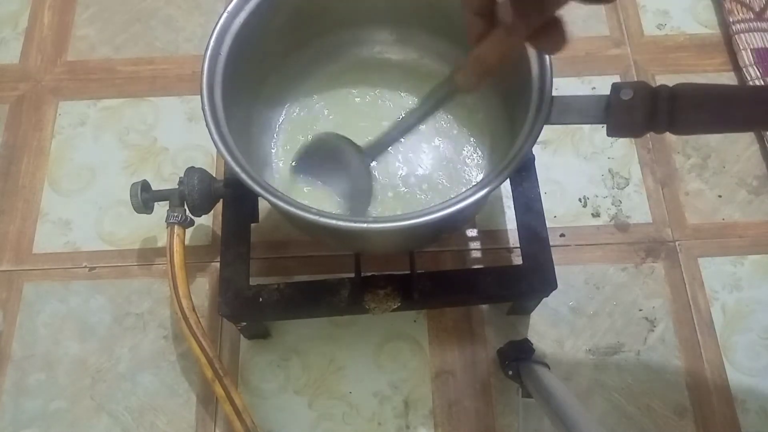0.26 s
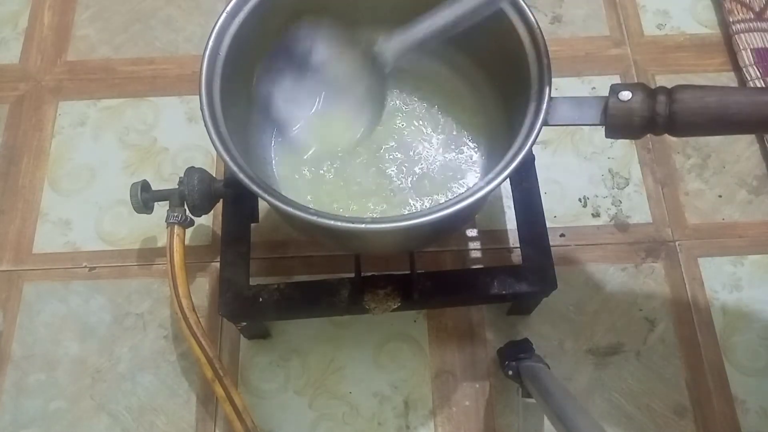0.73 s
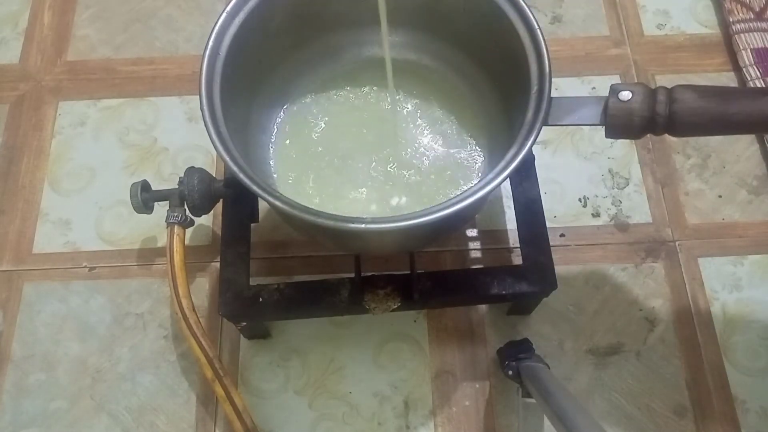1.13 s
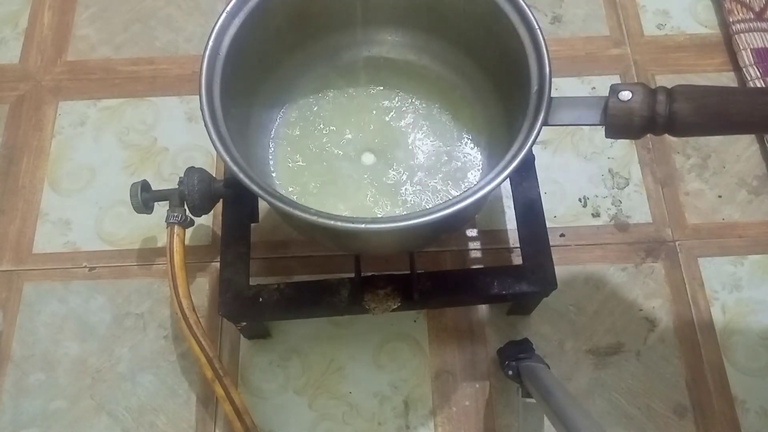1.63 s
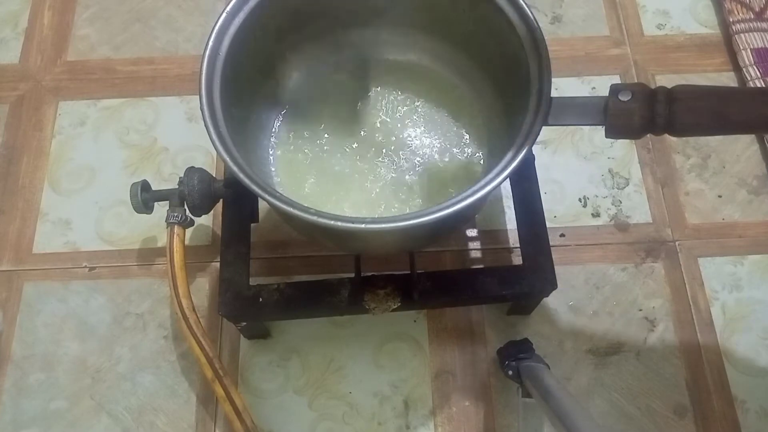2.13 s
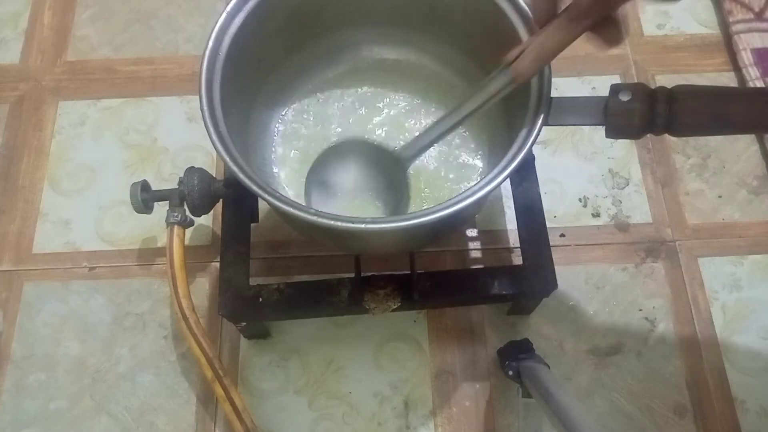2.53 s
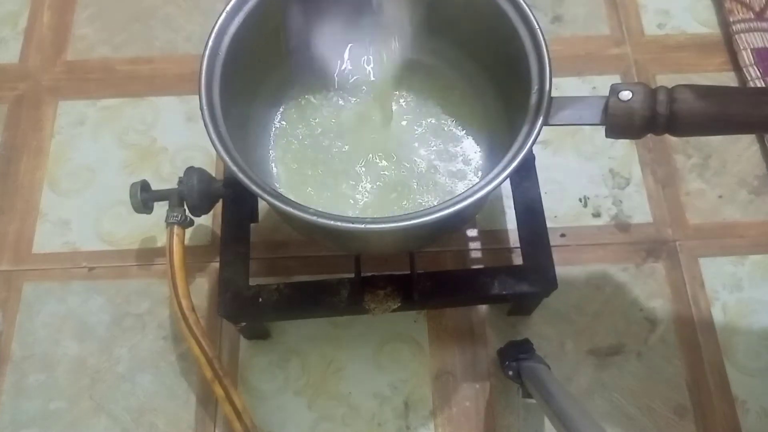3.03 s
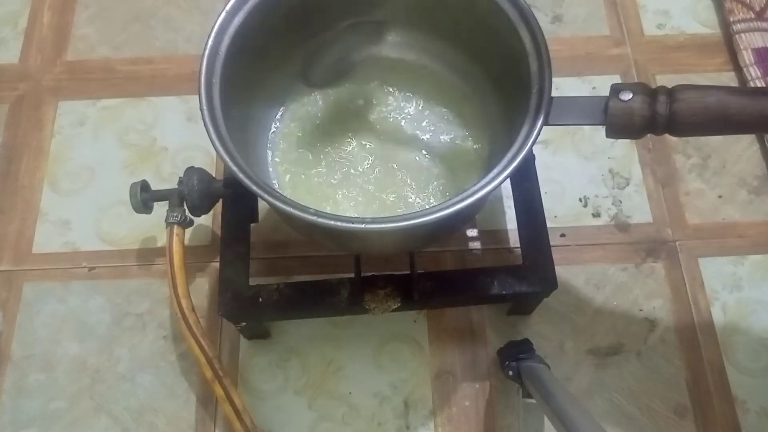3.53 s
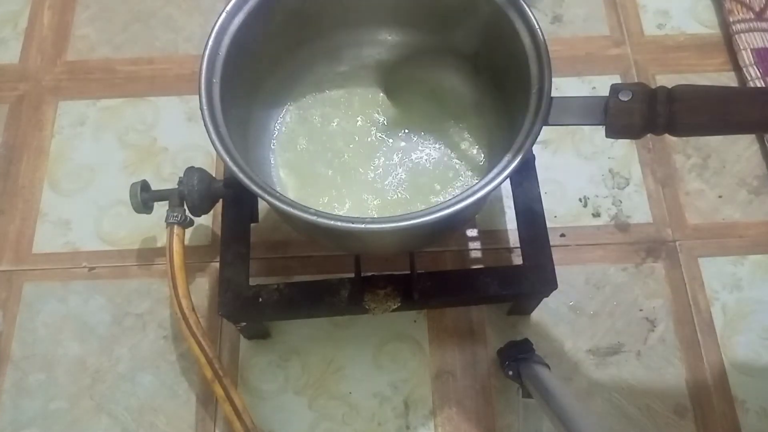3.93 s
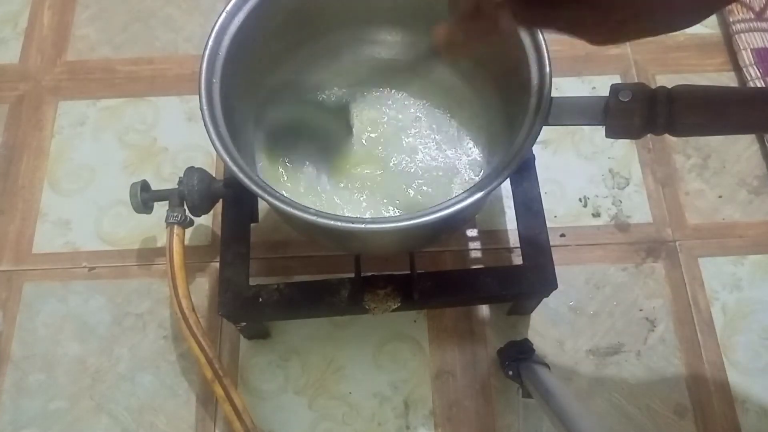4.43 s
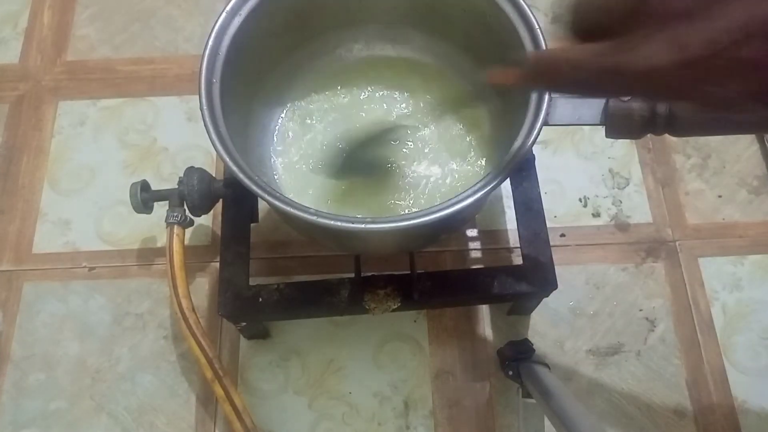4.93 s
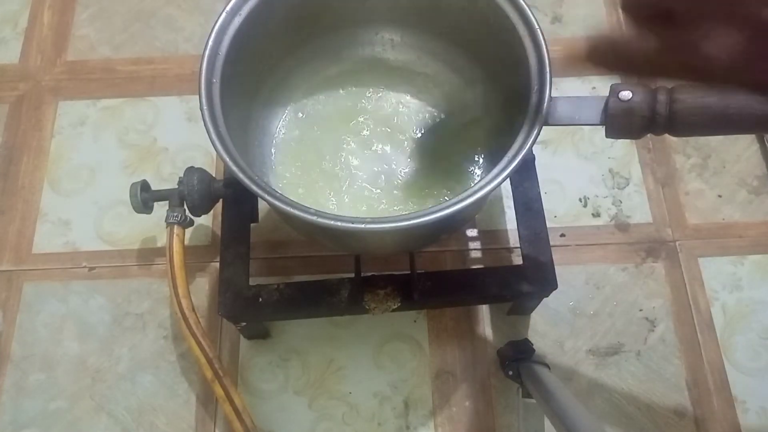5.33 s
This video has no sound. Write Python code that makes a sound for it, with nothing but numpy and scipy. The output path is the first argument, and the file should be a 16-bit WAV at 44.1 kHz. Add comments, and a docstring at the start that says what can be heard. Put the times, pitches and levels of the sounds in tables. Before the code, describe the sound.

For about five and a half seconds, coconut cream boils in a steel saucepan on a gas burner, heard close in mono through a small, thin-bassed microphone. A constant bright hiss, strongest in the treble, flickers with dense fine crackle and countless tiny ringing bubbles. Stirring at the start makes it slightly fuller, then it calms. A small ladle knock with a hollow pan ring comes at 1.0 s, amid wet pops. Around 2.0-2.2 s there is a clearer knock, a splash, sharp spits and a brief surge. Light gurgles continue, with very faint knocks at 2.8 and 3.6 s and crisp spits near 3.7 s. A lower slosh falls at 4.1 s, a burst of sharp spitting and sizzle at 4.6 s, then thicker churning at 4.8 s and a soft splash at 5.1 s. Barely audible low thuds and hum lie underneath; the sizzle continues to the end.

```python
"""Boiling coconut cream

Coconut cream boils in a steel saucepan on a gas ring while a ladle stirs and pours.
Steam is shaped noise, fine bubbles are short rings, gurgles and pops are resonant bursts of noise.
Spits, knocks and splashes follow tables; the pan's modes and air resonance colour the sound.
Low thuds, a hum and a low random flutter lie beneath."""
import sys
import numpy as np
from scipy import signal
from scipy.fft import rfft, irfft
from scipy.io import wavfile
from scipy.ndimage import uniform_filter1d

SR = 44100
rng = np.random.default_rng(int(sys.argv[2]) if len(sys.argv) > 2 else 0)


def digitize_waveform(pressure):
    """Quantize a signal to 16-bit integers and store it at the path in sys.argv[1].

    Rows of a 2-D input are taken as channels; values are limited to [-1, 1].
    """
    field = np.atleast_2d(pressure).T
    bounded = np.clip(field, -1, 1)
    quanta = np.round(bounded * 32767).astype(np.int16)
    wavfile.write(sys.argv[1], SR, quanta)


N = 245637

# Course of the boil. Each row: time in seconds, sizzle control in dB, churn control in dB.
BOIL_CURVES = [(0.0, -61.5, -54), (0.18, -62, -53), (0.32, -63, -59), (1.07, -61, -58.5), (1.55, -64, -61),
               (2.14, -57.5, -58), (2.42, -64, -63), (2.6, -60, -58.5), (3.2, -62, -58.5),
               (3.86, -57.5, -56.5), (4.1, -54.5, -55), (4.2, -58.5, -59.5), (4.48, -62, -59.5),
               (4.6, -53, -53.5), (4.78, -64, -51), (4.93, -61, -57.5), (5.12, -61.5, -52.5),
               (5.35, -61, -59.5), (5.57, -58, -59)]
# Hiss spectrum. Each row: frequency in Hz, relative level in dB.
STEAM_SPECTRUM = [(40, -45), (110, -19.5), (420, -27.5), (750, -20.5), (1150, -18.5), (1700, -18.5),
                  (2200, -10.5), (2500, -10.5), (4700, 0.5), (7000, 2), (16000, -5.5)]
# Timed gurgles, pops and bursts of high spray. Each row: start in seconds, time scale in seconds,
# pitch in Hz, relative level in dB.
GURGLE_EVENTS = [(0.0, 0.033, 2595, -45), (0.028, 0.047, 3120, -46.5), (0.09, 0.098, 589, -57),
                 (0.9, 0.041, 595, -57), (0.506, 0.031, 1890, -52.5), (0.53, 0.099, 2607, -44),
                 (0.999, 0.021, 585, -41.5), (1.003, 0.031, 4100, -43.5), (1.004, 0.014, 4950, -47),
                 (1.066, 0.045, 5670, -47), (1.641, 0.028, 4860, -41), (1.683, 0.031, 2504, -46.5),
                 (1.865, 0.037, 5760, -44.5), (1.995, 0.036, 3500, -47), (2.003, 0.015, 15100, -47.5),
                 (2.061, 0.093, 567, -52.5), (2.067, 0.05, 1470, -51.5), (2.087, 0.021, 2520, -40),
                 (2.106, 0.03, 5850, -43.5), (2.133, 0.036, 1515, -51.5), (2.195, 0.056, 1260, -55),
                 (2.202, 0.049, 805, -55), (2.236, 0.038, 5980, -46), (2.5, 0.074, 5780, -51.5),
                 (2.53, 0.054, 2020, -55.5), (2.57, 0.045, 568, -58), (2.655, 0.015, 2570, -46.5),
                 (2.69, 0.076, 5520, -50.5), (2.801, 0.043, 1605, -54), (2.853, 0.023, 3910, -47),
                 (2.9, 0.058, 3300, -51), (2.946, 0.041, 2630, -46.5), (3.0, 0.037, 3510, -51.5),
                 (3.098, 0.018, 3610, -47), (3.315, 0.02, 2310, -48.5), (3.313, 0.046, 5050, -45),
                 (3.42, 0.021, 3500, -49), (3.648, 0.043, 3303, -43), (3.675, 0.023, 2660, -45),
                 (3.726, 0.052, 5440, -53), (3.718, 0.026, 2464, -41.5), (3.788, 0.084, 6330, -47.5),
                 (3.9, 0.028, 7200, -40.5), (3.902, 0.062, 2380, -57.5), (4.065, 0.042, 597, -47.5),
                 (4.075, 0.042, 3320, -49.5), (4.09, 0.12, 1540, -59), (4.426, 0.12, 1273, -58),
                 (4.566, 0.013, 8940, -37), (4.567, 0.018, 15100, -46), (4.579, 0.034, 1890, -47.5),
                 (4.611, 0.12, 588, -54), (4.66, 0.096, 3360, -56.5), (4.756, 0.051, 1283, -51),
                 (4.77, 0.043, 1970, -54), (4.84, 0.057, 2450, -49), (4.85, 0.16, 2780, -58.5),
                 (4.988, 0.038, 3650, -49), (5.06, 0.039, 564, -52.5), (5.066, 0.078, 3550, -52),
                 (5.133, 0.031, 1350, -43), (5.1, 0.084, 2590, -46), (5.259, 0.072, 1857, -50.5),
                 (5.3, 0.026, 5360, -47)]
# Slosh thrown up by the ladle. Each row: start in seconds, time scale in seconds, centre in Hz,
# relative level in dB.
SPLASH_EVENTS = [(2.068, 0.046, 2550, -48), (4.068, 0.055, 1190, -42), (5.125, 0.09, 1750, -52.5)]
# Spits of fat and single bursting bubbles. Each row: start in seconds, nominal peak in dB, pitch in Hz,
# ring time in seconds.
SPIT_EVENTS = [(1.7495, -39.5, 10100, 0.0018), (2.0035, -25.5, 15100, .0003), (2.1151, -36, 5900, 0.00018),
               (2.2348, -36.5, 6260, 0.00022), (2.618, -37.5, 5100, 0.00091),
               (3.6516, -29.5, 12000, .00012), (3.791, -34.5, 3200, 0.002), (4.5411, -38, 10500, 0.0015),
               (4.5708, -27, 9300, 0.000098), (4.6412, -32.5, 6140, 0.00039)]
# Ladle and falling cream on the pan. Each row: start in seconds, peak in dB before the high-pass.
KNOCK_EVENTS = [(1.0075, -34.5), (2.069, -31), (2.812, -49.5), (3.564, -43.5)]
# Modes of pan, walls and air. Each row: frequency in Hz, nominal width in Hz, relative level in dB.
PAN_MODES = [(891, 57, -6.5), (1008, 43, -12), (1322.6, 39, -0.5), (1522, 90, -1), (1800, 160, -3.5),
             (1940, 23, -3), (2397, 34, -4.5), (2480, 22, 1), (2777, 57, 2.5), (3450, 250, 3.5),
             (4070, 63, 1), (4770, 91, 7.5), (5400, 51, 3)]
# Thuds through the stove. Each row: start in seconds, length in seconds, level in dB.
THUD_EVENTS = [(0.999, 0.071, -68), (2.246, 0.066, -68), (4.071, 0.088, -67), (4.63, 0.13, -67),
               (5.483, 0.057, -66)]
# Hum swells. Each row: start in seconds, time scale in seconds, level in dB.
HUM_EVENTS = [(1.45, 0.047, -69), (2.0, 0.035, -61.5), (3.65, 0.023, -62), (5.18, 0.03, -64)]
# Microphone response. Each row: frequency in Hz, gain in dB.
MICROPHONE_RESPONSE = [(6000, -0.5), (8100, -5.5), (10300, 2.5), (11900, -3.5), (12400, -11.5),
                       (13900, -11), (15300, -0.5)]

CALM_DB = -60  # churn control of a calm boil
SIMMER_LOW_HZ, SIMMER_TOP_HZ = 2400, 6300  # pitch range when calm
SIMMER_PER_S = 30  # rate when calm
RATE_GROWTH_PER_DB, SIZE_GROWTH_PER_DB = 0.32, 0.06  # exponents per dB of churn
SIMMER_SCALE_S, SIMMER_DB = 0.026, -58.5  # mean time scale when calm, relative level
HOLLOW_HZ, HOLLOW_DB, HOLLOW_SHARE = 576, -70, 0.42  # pitch, level when calm, dB per dB of churn
PITCH_WANDER = 0.0077  # share of pitch
THUD_HZ, HUM_HZ = 138, 315
BAND_EDGE_HZ = 15780


def steam():
    """Hiss and dense fine crackle, patchy as the froth opens and shuts; churning lifts the middle."""
    size = gain_of(3.2 * np.minimum(rng.exponential(1, N), 5))
    size = size * (rng.random(N) < 2500 / SR)  # 2500 crackles per second
    crackle = evened(size * rng.choice([-1, 1], N))
    hiss = rng.standard_normal(N) + 0.55 * crackle
    hz, t, z = signal.stft(hiss, SR, nperseg=512, noverlap=384)
    patches = uniform_filter1d(rng.standard_normal(z.shape), 3, axis=0)
    patches = evened(uniform_filter1d(patches, 16, axis=1))
    flicker = evened(uniform_filter1d(rng.standard_normal(len(t)), 6))

    column_hz = hz[:, None]
    middle = 1 / (1 + (column_hz / 4500) ** 4)
    high = 1 / (1 + (11000 / (column_hz + 1)) ** 6)
    low = 1 / (1 + (column_hz / 2200) ** 6)
    churn_db = control(2, t) - CALM_DB
    middle_db = CALM_DB + 3.5 + (0.85 + 0.11 * low) * churn_db
    level_db = middle * middle_db + (1 - middle) * control(1, t)
    level_db = level_db + (2.5 + 4.06 * middle) * patches
    level_db = level_db + (2.0 + 0.36 * high) * flicker
    z = z * read(STEAM_SPECTRUM, hz)[:, None] * gain_of(level_db)
    return gain_of(5.5) * signal.istft(z, SR, nperseg=512, noverlap=384)[1][:N]


def bubbles(count, low_hz, top_hz, decay_cycles, per_s, spread_db, offset_db):
    """Random bubbles of many sizes, each a short ring that rises from its own pitch."""
    out, t = np.zeros(N), np.arange(2048) / SR
    for hz in np.geomspace(low_hz, top_hz, count):
        decays = t * hz / decay_cycles  # time in decay constants
        tone = np.sin(2 * np.pi * hz * t * (1 + 0.0333 * np.minimum(decays, 4)))
        attack = np.minimum(t * hz / (0.23 * decay_cycles), 1) ** 2
        ring = tone * np.exp(-decays) * attack
        size = gain_of(spread_db * np.minimum(rng.exponential(1, N), 4))
        bursts = size * (rng.random(N) < per_s / count / SR)
        out += read(STEAM_SPECTRUM, hz) * signal.oaconvolve(bursts, ring)[:N]
    return evened(out) * gain_of(offset_db + control(1, np.arange(N) / SR))


def gurgle(scale_s, hz, db):
    """Uneven small bursts through one shrinking pocket: pitch rises; width in Hz grows with pitch."""
    t = np.arange(round(3 * scale_s * SR)) / SR / scale_s
    chance, slow = rng.standard_normal((2, SR // 2))[:, :len(t)]
    width_hz = 45 + 0.029 * hz
    pitch_hz = hz * (1 + 0.014 * (t - 0.5))
    bursts = chance * abs(chance)
    note = resonate(resonate(bursts, pitch_hz, width_hz), pitch_hz, 2.0 * width_hz)
    return gain_of(db) * evened(note * lumps(slow, 0.005, 2.07)) * swell(t)


def simmer():
    """Gurgle rows for random smaller pockets; stirring frees more and larger, lower ones."""
    t = np.arange(N) / SR
    churn_db = control(2, t) - CALM_DB
    wait, size, span = rng.random((500, 3)).T
    expected = np.cumsum(SIMMER_PER_S * np.exp(RATE_GROWTH_PER_DB * churn_db)) / SR
    start_s = np.interp(np.cumsum(2 * wait), expected, t, right=np.inf)
    larger = np.exp(SIZE_GROWTH_PER_DB * np.maximum(control(2, start_s) - CALM_DB, 0))
    hz = SIMMER_LOW_HZ * (SIMMER_TOP_HZ / SIMMER_LOW_HZ) ** size / larger
    scale_s = SIMMER_SCALE_S * larger * (0.5 + span)
    rows = np.transpose([start_s, scale_s, hz, np.full_like(hz, SIMMER_DB)])
    return rows[start_s < N / SR]


def splash(scale_s, hz, db):
    """A lumpy clump of slaps spread over a wide band."""
    t = np.arange(round(3 * scale_s * SR)) / SR / scale_s
    chance, slow = rng.standard_normal((2, SR // 2))[:, :len(t)]
    slaps = chance * lumps(slow, 0.003, 1.7)
    slosh = resonate(resonate(slaps, hz, 0.7 * hz), hz, 0.7 * hz)
    return gain_of(db) * evened(slosh) * swell(t)


def spit(db, hz, ring_s):
    """A click or short blip, rising in pitch, with a faint scatter of echoes off the pan wall."""
    t = np.arange(900) / SR
    tone = np.sin(2 * np.pi * hz * t * (1 + 0.051 * t / ring_s))
    click = tone * t / ring_s * np.exp(1 - t / ring_s)
    scatter = np.diff(rng.standard_normal(len(t) + 1))
    return gain_of(db) * (click + 0.23 * scatter * np.exp(-t / 0.0036))


def knock(db):
    """A short blow with a decaying splash of noise; the cream swallows the bass."""
    t = np.arange(3000) / SR
    blow = (1 - t / 0.000085) * np.exp(-t / 0.0001)
    sound = blow + 0.085 * rng.standard_normal(len(t)) * np.exp(-t / 0.038)
    return gain_of(db) * signal.lfilter(*signal.butter(2, 480, "high", fs=SR), sound)


def ringing(x):
    """The pan's modes ring on after whatever shakes them."""
    return sum(gain_of(db) * resonate(x, hz, 0.65 * width_hz) for hz, width_hz, db in PAN_MODES)


def walls():
    """Froth and ladle rub the pan: each mode fluctuates alone; low modes follow churn most, top ones least."""
    churn_db = control(2, np.arange(N) / SR)
    low_extra = gain_of(0.5 * (churn_db + 56.0))
    top_easing = gain_of(0.15 * (CALM_DB - churn_db))
    notes = np.zeros(N)
    for hz, width_hz, db in PAN_MODES:
        follow = low_extra if hz < 2200 else 1 if hz < 4500 else top_easing
        notes += gain_of(db) * puffed_note(hz, 2.0 * width_hz, 5, 0.047) * follow
    return notes * gain_of(-13.5 + churn_db)


def hollow():
    """The churn drives the lowest air resonance of the pan."""
    churn_db = control(2, np.arange(N) / SR) - CALM_DB
    return puffed_note(HOLLOW_HZ, 99, 5.4, 0.049) * gain_of(HOLLOW_DB + HOLLOW_SHARE * churn_db)


def thud(length_s, db):
    """A soft swell of low resonant noise, through the stove as the ladle works."""
    count = round(length_s * SR)
    noise = rng.standard_normal(SR)[:count + 2000]
    note = resonate(resonate(noise, THUD_HZ, 75), THUD_HZ, 75)[2000:]  # skip the filter's build-up
    return gain_of(db) * evened(note) * np.hanning(count)


def hum(scale_s, db):
    """A low sine that swells and fades."""
    t = np.arange(round(2.95 * scale_s * SR)) / SR
    return gain_of(db) * np.sqrt(2) * np.sin(2 * np.pi * HUM_HZ * t) * np.hanning(len(t))


def flutter():
    """A low random flutter of resonant noise, with a faint tonal band at the hum's pitch."""
    low = gain_of(-84.5) * puffed_note(127, 123, 2.1, 0.029)
    return low + gain_of(-83.0) * puffed_note(HUM_HZ, 78, 6.2, 0.036)


def puffed_note(hz, width_hz, depth_db, puff_s):
    """Noise in uneven puffs through a steep resonance whose pitch wanders."""
    drive = gain_of(depth_db * puffs(puff_s)) * rng.standard_normal(N)
    pitch_hz = hz * (1 + PITCH_WANDER * puffs(0.076))
    return evened(resonate(resonate(drive, pitch_hz, width_hz), pitch_hz, width_hz))


def puffs(seconds):
    """Slow random curve of unit RMS, smoothed twice over the given time."""
    size = round(seconds * SR)
    return evened(uniform_filter1d(uniform_filter1d(rng.standard_normal(N), size), size))


def lumps(chance, seconds, depth_db):
    """Uneven gain from noise smoothed over the given time."""
    return gain_of(depth_db * evened(uniform_filter1d(chance, round(seconds * SR))))


def swell(t):
    """Quick rise, slower fall; t in units of the event's time scale."""
    return np.minimum(t / 0.2, 1) ** 2 * np.exp(-(np.maximum(t - 0.5, 0) / 0.76) ** 1.04)


def resonate(x, hz, width_hz):
    """Resonance of gain 1, steady or moving: shift hz to zero, smooth, shift back."""
    turn = np.exp(2j * np.pi * np.cumsum(hz * np.ones(len(x))) / SR)
    r = np.exp(-np.pi * width_hz / SR)
    return 2 * (turn * signal.lfilter([1 - r], [1, -r], x * turn.conj())).real


def control(column, t):
    """One column of the boil curves at the times t."""
    curves = np.transpose(BOIL_CURVES)
    return np.interp(t, curves[0], curves[column])


def read(points, hz):
    """Gain at hz from (Hz, dB) points, interpolated over log frequency."""
    f, db = np.transpose(points)
    return gain_of(np.interp(np.log(hz + 1), np.log(f), db))


def gain_of(db):
    """Amplitude factor of a level in dB."""
    return 10 ** (np.asarray(db) / 20)


def evened(x):
    """Scales to unit RMS."""
    return x / np.sqrt(np.mean(x ** 2) + 1e-20)


def played(table, source):
    """All events of one table on a silent track."""
    track = np.zeros(N)
    for start_s, *row in table:
        sound = source(*row)
        part = track[round(start_s * SR):][:len(sound)]
        part += sound[:len(part)]
    return track


def scene():
    """Sums the sources; gurgles, splashes and knocks also shake the pan."""
    mix = steam()
    mix += bubbles(count=24, low_hz=2330, top_hz=6670, decay_cycles=9.0, per_s=1400, spread_db=6.5, offset_db=0)
    mix += bubbles(count=16, low_hz=5380, top_hz=14180, decay_cycles=12.0, per_s=1100, spread_db=5.5, offset_db=1)
    mix += bubbles(count=6, low_hz=5900, top_hz=15100, decay_cycles=1.4, per_s=120, spread_db=8.5, offset_db=-11)
    bursts = played(GURGLE_EVENTS, gurgle) + played(simmer(), gurgle) + played(SPLASH_EVENTS, splash)
    knocks = played(KNOCK_EVENTS, knock)
    mix += gain_of(-3.5) * bursts + played(SPIT_EVENTS, spit) + knocks
    mix += ringing(gain_of(-4.5) * bursts + gain_of(17.5) * knocks)
    mix += gain_of(23.0) * resonate(knocks, HOLLOW_HZ, 62)  # knocks excite the air in the pan
    mix += walls() + hollow()
    mix += played(THUD_EVENTS, thud) + played(HUM_EVENTS, hum) + flutter()
    return mix[None]  # one channel


def record(dry):
    """A small microphone colours the treble and loses the deep bass; then a low-pass limits the band."""
    hz = np.fft.rfftfreq(N, 1 / SR)
    bass_loss = np.sqrt(1 + (70 / (hz + 1)) ** 3)
    coloured = irfft(rfft(dry) * read(MICROPHONE_RESPONSE, hz) / bass_loss, N)
    low_pass = signal.firwin(801, BAND_EDGE_HZ, window=("kaiser", 9), fs=SR)
    return signal.oaconvolve(coloured, low_pass[None], "same")


dry = scene()
out = record(dry)
digitize_waveform(out)
```